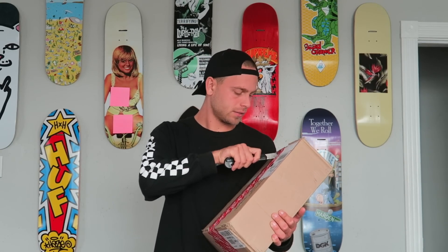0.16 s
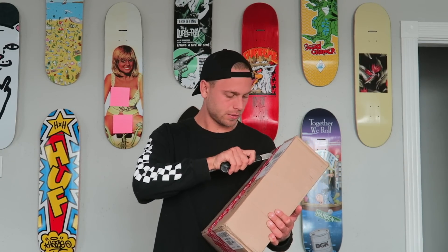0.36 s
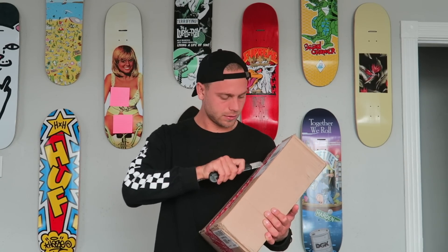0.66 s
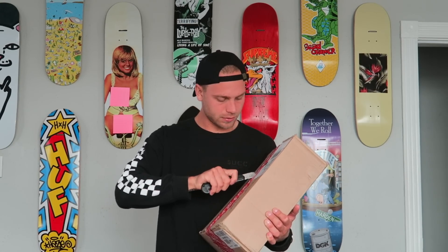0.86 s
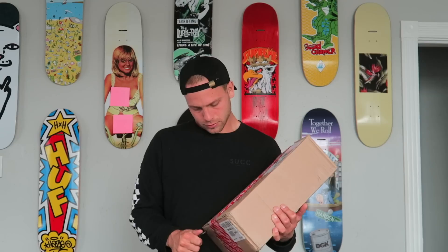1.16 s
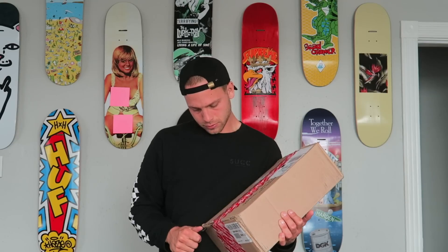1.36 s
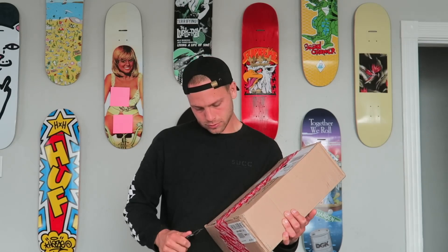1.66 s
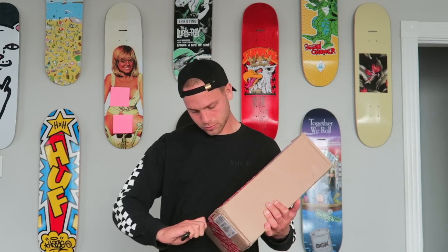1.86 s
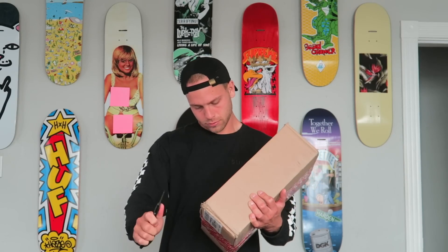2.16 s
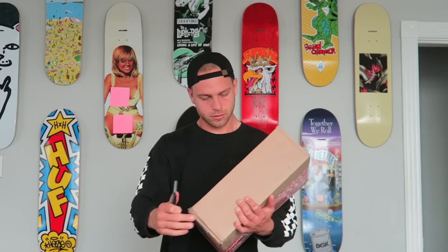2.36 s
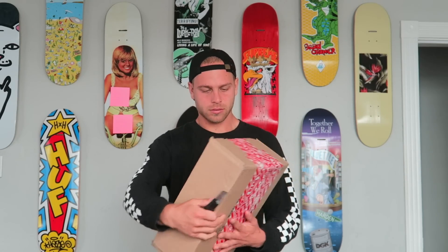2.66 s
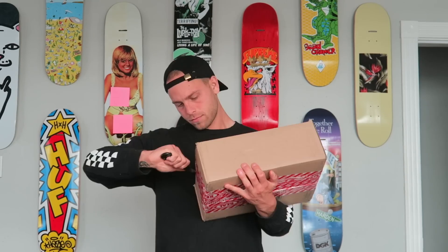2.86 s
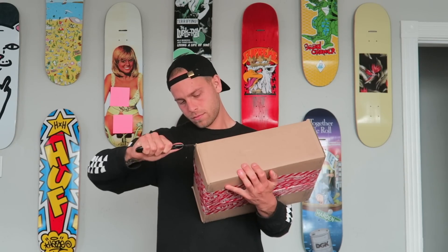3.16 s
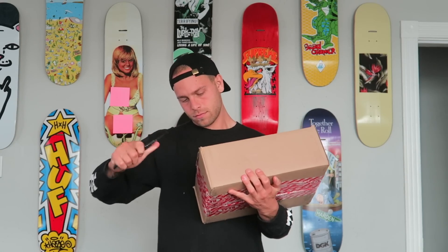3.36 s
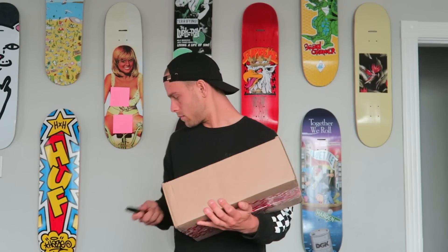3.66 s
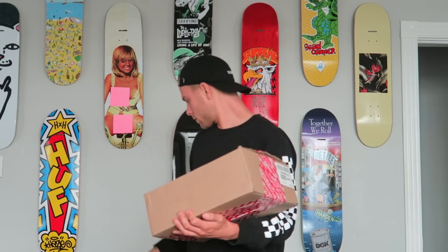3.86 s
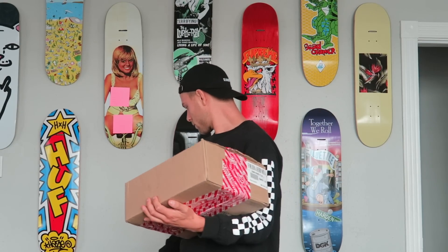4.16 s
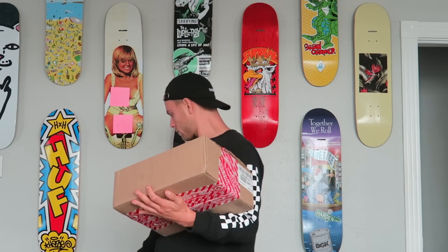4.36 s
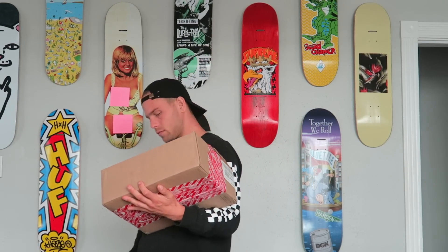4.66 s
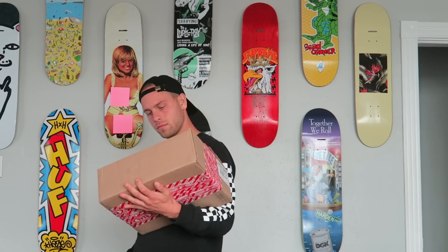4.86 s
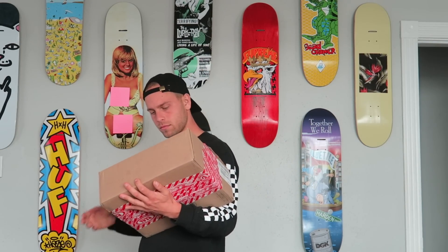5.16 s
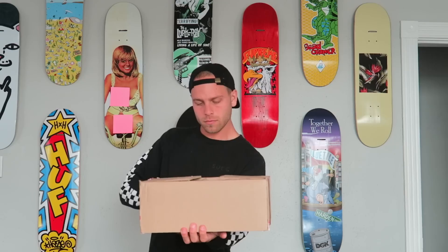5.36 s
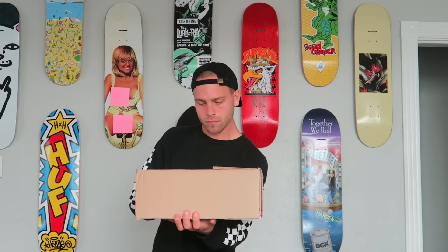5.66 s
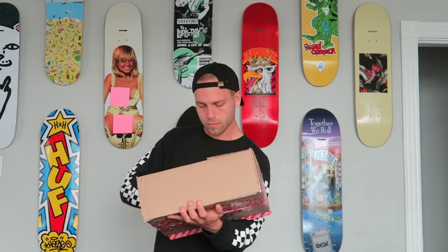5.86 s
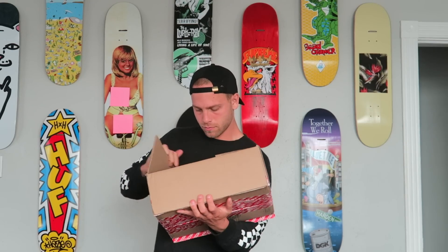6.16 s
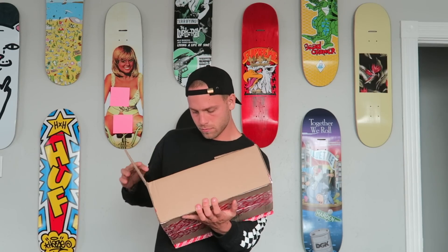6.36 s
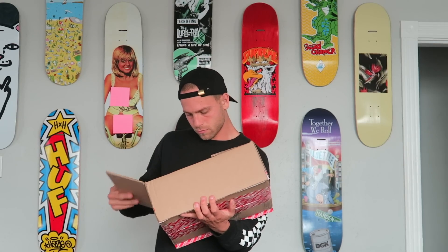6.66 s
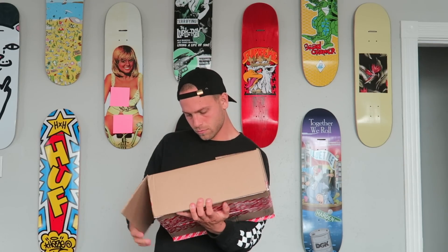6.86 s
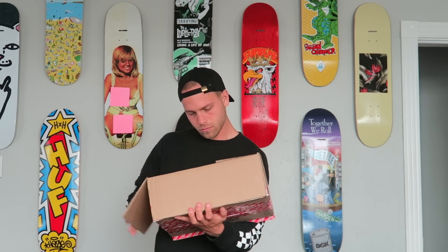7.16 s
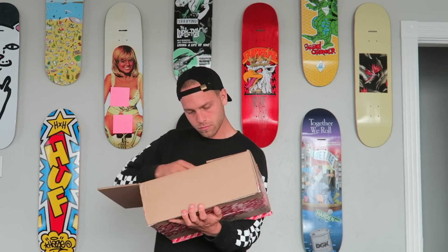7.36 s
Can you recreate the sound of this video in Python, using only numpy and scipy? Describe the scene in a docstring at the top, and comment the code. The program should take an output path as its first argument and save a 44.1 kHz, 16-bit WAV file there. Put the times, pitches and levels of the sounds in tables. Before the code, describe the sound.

A bare, reflective room with low ventilation noise and a faint wavering hum. From 0.05 to 0.25 s a blade jabs into a taped cardboard box with hollow crunches, then a rubbing slice runs along the seam from 0.6 to 1.1 s. Harder punctures come around 1.1-1.35, 1.7, 1.95-2.1, 2.75 and 3.05-3.2 s, mixing boxy thumps, tearing crackle and soft handling bumps. A light flick sounds at 3.35 s. From 3.63 to 3.9 s the blade rattles rapidly into its handle and clicks with a short metallic ring. A soft tap at 4.25 s precedes the knife clattering down at 4.77 s and bouncing at 4.96 s. A knock at 5.4 s leads to cardboard strokes, hand rustle and a creak near 6.1 s; flaps knock and drag at 6.7-6.98 s, then hissy sliding fades by 7.5 s. Echoes cut abruptly near 1.16, 1.84, 2.93 and 5.41 s.

```python
"""A knife jabs and saws through the tape of a hand-held cardboard box in a bare, ringing room.
Clicks and hiss are shaped into crushed board and splitting tape, while ringing tones make the box body.
The blade rattles back into its handle and clicks home; the knife is dropped and bounces.
Then hands slide over the board, as filtered grains and hiss, and the flaps creak and knock open.
A low room noise with a wavering hum lies beneath. Four times the sound breaks off abruptly."""
import sys
import numpy as np
from scipy import signal
from scipy.fft import rfft, irfft
from scipy.io import wavfile

SR = 44100
rng = np.random.default_rng(int(sys.argv[2]) if len(sys.argv) > 2 else 0)


def digitize_waveform(pressure):
    """Quantize a signal to 16-bit integers and store it at the path in sys.argv[1].

    Rows of a 2-D input are taken as channels; values are limited to [-1, 1].
    """
    field = np.atleast_2d(pressure).T
    bounded = np.clip(field, -1, 1)
    quanta = np.round(bounded * 32767).astype(np.int16)
    wavfile.write(sys.argv[1], SR, quanta)


N = 331632
TIME = np.arange(N) / SR  # seconds
HIT = SR // 3  # room for one hit, in samples

# Moments when the sounds and their echoes stop dead. Each entry: time in seconds.
BREAKS_S = [1.157, 1.84, 2.925, 5.41]
# Colour of a dull contact. Each row: frequency in Hz, level in dB.
DULL_CONTACT = [(90, -16.5), (200, 5), (400, 3.5), (1000, 4.5), (1500, 2), (3000, -39)]
# Colour of a light crisp contact. Each row: frequency in Hz, level in dB.
CRISP_CONTACT = [(900, -3), (1800, 2), (2800, 1.5), (4500, -8), (7500, -15), (11000, -22.5), (15500, -41)]
# Rubbing strength of four long slides over the box, which the table of slides refers to by name.
# Each row: time in seconds, relative level in dB.
SEAM_SLIDE = [(0.62, -70), (0.69, -37), (0.794, -36), (0.928, -46.5), (1.038, -35), (1.085, -38.5)]
TURN_SLIDE = [(5.42, -46.5), (5.486, -44), (5.628, -38), (5.772, -38), (5.79, -42), (6.126, -39.5),
              (6.182, -53), (6.198, -44), (6.42, -57)]
FLAP_SLIDE = [(6.42, -52.5), (6.634, -50.5), (6.672, -57), (6.678, -46), (6.764, -50.5), (6.802, -43.5),
              (6.898, -48.5), (6.98, -28.5), (7.17, -71)]
REACH_SLIDE = [(7.17, -55), (7.318, -37.5), (7.422, -51), (7.512, -67), (7.52, -53)]


def undb(db):
    """Turn decibels into gain."""
    return 10 ** (np.asarray(db) / 20)


def unit(x):
    """Scale to an rms (average strength) of 1."""
    return x / np.sqrt(np.mean(x ** 2) + 1e-30)


def blow(x, db):
    """Scale a hit so that its energy equals this level held for 5 ms."""
    energy = np.sum(x ** 2) + 1e-30
    return x * undb(db) * np.sqrt(0.005 * SR / energy)


def lookup(table, hz):
    """Read between the (Hz, value) points of a table, on a log-frequency axis."""
    f, value = np.transpose(table)
    return np.interp(np.log(hz + 1e-9), np.log(f), value)


def colour(x, spectrum, size=4096):
    """Filter a sound to the given (Hz, dB) shape without any sound ahead of its cause."""
    gain = undb(lookup(spectrum, np.fft.rfftfreq(size, 1 / SR)))
    cepstrum = irfft(np.log(gain))
    # fold the second half onto the first, so that the filter only looks back in time
    cepstrum[1:size // 2] *= 2
    cepstrum[size // 2 + 1:] = 0
    response = irfft(np.exp(rfft(cepstrum)))[:size // 2]
    return signal.fftconvolve(x, response)[:len(x)]


def grains(n, rate, spread_db):
    """Fibres snapping at random, rate times a second: many tiny clicks and a few big ones."""
    snaps = rng.random(n) < rate / SR
    signs = rng.choice([-1, 1], n)
    sizes = undb(spread_db * np.minimum(rng.exponential(size=n), 4))
    return unit(snaps * signs * sizes)


def burst(length, rate, spread_db, first, rise_s=0.0033):
    """A first contact, then a run of small slips that builds up and dies away over length seconds."""
    t = TIME[:HIT]
    envelope = np.exp(-t / max(length, 1e-4)) * (1 - np.exp(-t / rise_s))
    slips = grains(HIT, rate, spread_db) * envelope
    slips = slips / np.sqrt(np.sum(slips ** 2) + 1e-18)
    slips[0] += first
    return slips


def ring(push, modes):
    """A push sets off fading tones, the natural vibrations of a solid or of enclosed air."""
    t = TIME[:HIT]
    response = np.zeros(HIT)
    for hz, db, t60 in modes:
        tone = np.sin(2 * np.pi * hz * t + rng.uniform(0, 2 * np.pi))
        response += undb(db) * tone * np.exp(-np.log(1000) * t / t60)  # 60 dB down after t60
    return signal.fftconvolve(push, response * (1 - np.exp(-t / 0.0017)))[:HIT]


def add(track, s, sound):
    """Lay a sound in at time s; it ends at the next break."""
    start = int(s * SR)
    later_breaks = [int(b * SR) for b in BREAKS_S if b > s]
    end = min([start + len(sound), N] + later_breaks)
    track[start:end] += sound[:end - start]


def walk(rate):
    """Slow random wavering with a spread near 1, taking rate new values a second."""
    knots = rng.standard_normal(N // 100)
    return np.interp(TIME * rate, np.arange(len(knots)), knots)


def swell(s, db):
    """Gain that follows a dB curve and is practically silent outside it."""
    return undb(np.interp(TIME, s, db, left=-120, right=-120))


def brush(s, swell_s):
    """A short stroke that swells up to time s and lifts off a little faster."""
    width_s = np.where(TIME < s, swell_s, swell_s * 0.73)
    return np.exp(-((TIME - s) / width_s) ** 2)


def room_tone(noise_db=-46, waver_db=2):
    """Low ventilation noise, shaped from random noise, with a wavering hum of pure tones."""
    # Colour of the noise. Each row: frequency in Hz, level in dB.
    noise_colour = [(15, -36), (25, -21), (54, -3.5), (121, 2), (172, -4), (427, -9), (769, -13.5),
                    (1060, -15), (1210, -17), (2630, -20), (5280, -29), (10000, -44), (11200, -37),
                    (13100, -52), (15000, -52)]
    # How wide the noise is. Each row: frequency in Hz, side level relative to mid in dB.
    noise_width = [(50, -44), (130, -11), (300, -0.5), (900, -3.5), (2500, -19.5), (8000, 2.5)]
    # Tones of the hum. Each row: frequency in Hz, typical level in dB.
    hum_tones = [(59, -51.5), (122, -54.5)]
    mid = unit(colour(rng.standard_normal(N), noise_colour)) * undb(noise_db + 0.37 * walk(6.5))
    side = colour(unit(colour(rng.standard_normal(N), noise_colour)), noise_width) * undb(noise_db)
    hum = np.zeros(N)
    for hz, db in hum_tones:
        tone = np.sqrt(2) * np.sin(2 * np.pi * hz * TIME + 0.5 * walk(11))
        hum += undb(db + waver_db * walk(11)) * tone
    return np.array([mid + side, mid - side]) + hum


def room_tail(delay_s=0.003, build_s=0.00073):
    """Dense reflections from bare walls: noise in which every band fades at its own rate."""
    # How long the room rings. Each row: frequency in Hz, time to fade by 60 dB in seconds.
    fade_times = [(100, 0.39), (260, 0.55), (700, 0.57), (1840, 0.57), (4850, 0.54), (12800, 0.41)]
    f, t, cells = signal.stft(rng.standard_normal(SR * 3 // 4), SR, nperseg=256)
    fade = np.exp(-np.log(1000) * t / lookup(fade_times, f)[:, None])
    tail = signal.istft(cells * fade, SR)[1]
    since_arrival = np.maximum(TIME[:len(tail)] - delay_s, 0)
    tail = tail * (1 - np.exp(-since_arrival / build_s))
    return tail / np.sqrt(np.sum(tail ** 2))


def room(x):
    """Echoes, wide only in the treble, stop dead at each break; after each break the reflections are drawn
    anew."""
    # How wide the echoes are. Each row: frequency in Hz, side level relative to mid in dB.
    echo_width = [(100, -41), (400, -14), (1200, -26), (2600, -66.5), (4400, -22), (6500, -3.5), (9000, 3),
                  (15000, 0.5)]
    heard = []
    for part in np.split(x, [int(b * SR) for b in BREAKS_S]):
        # every part between breaks has its own pattern of reflections
        mid, side = room_tail(), colour(room_tail(), echo_width)
        tails = np.array([mid + side, mid - side])
        heard.append(signal.fftconvolve(part[None], tails, axes=1)[:, :len(part)])
    return np.hstack(heard)


def handling():
    """Light taps of fingers and things put aside, and soft low bumps as the body shifts its weight."""
    # Taps. Each row: start in seconds, dull level in dB, crisp level in dB, fading time in seconds.
    taps = [(0.168, -35, -36.5, 0.0072), (2.349, -52, -38.5, 0.024), (3.346, -35, -24, 0.017),
            (4.248, -28, -30.5, 0.0064), (5.403, -28, -33, 0.0043), (6.678, -56, -31, 0.0059),
            (6.716, -28.5, -43, .012)]
    # Bumps. Each row: start in seconds, level in dB, fading time in seconds.
    bumps = [(0.239, -26.5, 0.031), (2.057, -23, 0.044), (2.767, -24, 0.089), (3.069, -22.5, 0.11),
             (3.148, -26, .05), (4.25, -30.5, 0.027), (4.386, -31.5, 0.02)]
    # Colour of a bump. Each row: frequency in Hz, level in dB.
    bump_colour = [(20, -19), (45, -13), (78, 0), (125, 2), (220, -10.5), (500, -24), (1500, -75)]
    out = np.zeros(N)
    for s, dull_db, crisp_db, length in taps:
        touch = burst(length, rate=2800, spread_db=5.5, first=0.055)
        dull = blow(colour(touch, DULL_CONTACT), dull_db)
        crisp = blow(colour(touch, CRISP_CONTACT), crisp_db)
        add(out, s, dull + crisp)
    for s, db, length in bumps:
        push = burst(length, rate=680, spread_db=3.5, first=0.4)
        add(out, s, blow(colour(push, bump_colour), db))
    return out


def rubs(board_db=-1, hiss_db=-2.5, uneven_db=4.0, crackle_db=-7):
    """Sliding friction: the board rumbles, its smooth face hisses and loose tape crackles."""
    # Short brushes of blade or hand across the box. Each row: time of the height in seconds,
    # swell time in seconds, relative board level in dB, relative hiss level in dB.
    brushes = [(1.26, 0.081, -42.5, -44.5), (1.688, 0.052, -41.5, -43), (1.945, 0.04, -48, -42.5),
               (2.56, 0.059, -47.5, -66), (2.694, 0.11, -46, -38), (2.985, 0.044, -41, -48.5),
               (3.047, 0.012, -26, -26), (3.56, 0.077, -50, -67), (4.5, .08, -52, -54),
               (5.36, 0.18, -43, -54.5)]
    # What each long slide stirs. Each row: curve of rubbing strength, then board level in dB and
    # hiss level in dB, both relative to that curve.
    slides = [(SEAM_SLIDE, 0.66, -10.5), (TURN_SLIDE, -3.5, 0.5), (FLAP_SLIDE, -0.87, 0.93),
              (REACH_SLIDE, -13, 2.45)]
    # Colour of the rumbling board. Each row: frequency in Hz, level in dB.
    board_colour = [(80, -23), (170, 2.5), (300, 3), (400, 3), (500, 4.5), (680, -4), (1000, -3.5),
                    (1350, -5), (2000, -14), (4000, -49)]
    # Colour of the hissing face. Each row: frequency in Hz, level in dB.
    hiss_colour = [(900, 3.5), (1700, 2.5), (2700, 4.5), (4500, 1), (7000, -4), (11000, -8.5), (15500, -23)]
    board = undb(board_db) * unit(colour(grains(N, rate=2000, spread_db=3.0), board_colour))
    hiss = unit(colour(rng.standard_normal(N), hiss_colour))
    crackle = unit(colour(grains(N, rate=140, spread_db=3.5), CRISP_CONTACT))
    surface = undb(hiss_db) * hiss + undb(crackle_db) * crackle
    moves = [(brush(s, swell_s), press_db, face_db) for s, swell_s, press_db, face_db in brushes]
    moves += [(swell(*np.transpose(curve)), press_db, face_db) for curve, press_db, face_db in slides]
    sound = np.zeros(N)
    for strength, press_db, face_db in moves:
        sound += strength * (undb(press_db) * board + undb(face_db) * surface)
    return sound * undb(uneven_db * walk(45))


def drags(table, modes, first):
    """An edge catches and slips on the board and sets its vibrations ringing."""
    out = np.zeros(N)
    for s, db, length in table:
        slips = burst(length, rate=1200, spread_db=1.5, first=first)
        add(out, s, blow(ring(slips, modes), db))
    return out


def edge_strokes():
    """Flaps and box edges rub in short strokes whose slips make the board ring."""
    # Strokes. Each row: start in seconds, level in dB, fading time in seconds.
    strokes = [(5.602, -21.5, 0.026), (5.645, -33, 0.015), (5.845, -25, 0.035)]
    # Ringing of the board. Each row: frequency in Hz, level in dB, time to fade by 60 dB in seconds.
    stroke_modes = [(183, -4.5, 0.031), (404, -6, 0.042), (503, -2, 0.06), (940, -15, 0.023),
                    (1378, 1, 0.043), (1380, 0.5, 0.027)]
    return drags(strokes, stroke_modes, first=0.35)


def flap_knocks():
    """The open flap knocks and drags, and its slips make the box boom."""
    # Knocks. Each row: start in seconds, level in dB, fading time of the drag in seconds.
    knocks = [(5.397, -15, 0.0056), (6.714, -18, 0.003), (6.741, -21.5, 0.013), (6.815, -25, 0.071),
              (6.91, -16, 0.01), (6.953, -19, 0.014)]
    # Ringing of the open box. Each row: frequency in Hz, level in dB, time to fade by 60 dB in seconds.
    open_box = [(125, -16, 0.19), (202, -15, 0.048), (262, -3.5, 0.06), (342, 2, 0.048), (396, -2.5, 0.083),
                (445, -26, .05), (715, -16, 0.026), (1060, -17.5, 0.015)]
    return drags(knocks, open_box, first=0.45)


def creak(gain_db=-3):
    """The stiff fold of a flap yields in uneven slips."""
    # Slips. Each row: start in seconds, relative level in dB, fading time in seconds.
    fold_slips = [(6.089, -19, 0.016), (6.111, -16, 0.0031), (6.122, -11.5, 0.014), (6.139, -12.5, 0.014),
                  (6.231, -28.5, 0.0045)]
    # Colour of the fold. Each row: frequency in Hz, level in dB.
    fold_colour = [(100, -26), (220, -12), (370, 2.5), (520, 2.5), (620, -3.5), (740, -3), (1250, -6.5),
                   (1800, -14), (3000, -23.5), (8000, -55)]
    out = np.zeros(N)
    for s, db, length in fold_slips:
        slips = burst(length, rate=1800, spread_db=2.5, first=0.4)
        add(out, s, blow(colour(slips, fold_colour), db + gain_db))
    return out


def dropped_knife(gain_db=-5.0, ring_db=-13, thud_db=-6.5):
    """The knife lands on a hard top, bounces once and settles: a crack, a ring and a thud each time."""
    # Contacts. Each row: start in seconds, relative level in dB, fading time of the clatter in seconds.
    drops = [(4.7637, -12.5, 0.012), (4.768, -7.5, 0.0049), (4.787, -19, 0.0075), (4.958, -21.5, 0.0096),
             (4.966, -9, 0.025), (5.014, -19, 0.033)]
    # Ringing of the knife. Each row: frequency in Hz, level in dB, time to fade by 60 dB in seconds.
    knife_modes = [(320, -28, 0.059), (580, 7, 0.078), (830, -11, 0.1), (1005, 9, 0.12), (1900, -8, 0.047),
                   (2410, -8, .02), (2950, 0, 0.085), (3450, -11, 0.041), (4500, -11, .02),
                   (6600, 4, 0.033)]
    # Colour of the crack. Each row: frequency in Hz, level in dB.
    crack_colour = [(500, -30.5), (1300, -10), (1900, 2), (2500, -1.5), (3300, 5), (4300, -2.5),
                    (6500, -9.5), (9000, -12.5), (12000, -15.5), (15500, -42)]
    out = np.zeros(N)
    for s, db, length in drops:
        contact = burst(length, rate=6000, spread_db=0.5, first=0.31, rise_s=0.002)
        crack = blow(colour(contact, crack_colour), 0)
        ringing = blow(ring(contact, knife_modes), ring_db)
        thud = blow(colour(contact, DULL_CONTACT), thud_db)
        add(out, s, undb(db + gain_db) * (crack + ringing + thud))
    return out


def blade_stop(gain_db=-10.0, ring_db=-8):
    """The blade clicks home, chatters against its stop and rings on briefly."""
    # Clicks. Each row: start in seconds, relative level in dB.
    clicks = [(3.8948, -1.5), (3.8969, -5.5), (3.9, -5.5), (3.903, -12)]
    # Colour of the handle. Each row: frequency in Hz, level in dB.
    handle_colour = [(700, -52), (1400, -15), (2000, -1.5), (2700, 7), (3300, 0), (4100, -10.5),
                     (6000, -13.5), (11000, -53), (15500, -34)]
    # Ringing of the blade. Each row: frequency in Hz, level in dB, time to fade by 60 dB in seconds.
    blade_modes = [(2580, 1, .45), (2660, -3, 0.49), (2893, -1, 0.38), (3135, 4, .45), (3310, -7, 0.26)]
    out = np.zeros(N)
    for s, db in clicks:
        contact = burst(0.0005, rate=20000, spread_db=1, first=0.3, rise_s=0.0005)
        click = blow(colour(contact, handle_colour), db + gain_db)
        ringing = blow(ring(contact, blade_modes), db + gain_db + ring_db)
        add(out, s, click + ringing)
    return out


def blade(catch_db=-3, tick_db=-4.5, shift_octaves=0.11):
    """The blade scrapes back into its handle and keeps catching: a tick, the catch, a rebound."""
    # Strength of the scrape over time. Each row: time in seconds, level in dB.
    scrape = [(3.634, -40), (3.645, -25.5), (3.72, -24), (3.8, -24), (3.85, -26), (3.885, -27.5),
              (3.9, -60)]
    # Catches of the sliding blade. Each row: start in seconds, relative level in dB.
    catches = [(3.644, -16.5), (3.672, -14.5), (3.705, -13), (3.734, -15.5), (3.756, -14.5), (3.779, -23),
               (3.803, -15.5), (3.822, -17), (3.8541, -16)]
    # Colour of the blade. Each row: frequency in Hz, level in dB.
    blade_colour = [(350, -24), (600, -18), (890, -14.5), (1560, -7.5), (1880, 2), (2570, 4.5), (2910, 0),
                    (3420, 3), (4090, -3), (4810, -0.5), (5900, -5), (8870, -7.5), (12100, -14.5),
                    (15500, -35)]
    gap_s, chatter_s = 0.005, 0.003  # spacing of tick, catch and rebound; fading time of each
    out = swell(*np.transpose(scrape)) * unit(colour(grains(N, rate=7000, spread_db=2.0), blade_colour))
    for s, db in catches:
        for offset, part_db in [(-gap_s, tick_db), (0, 0), (gap_s, tick_db)]:
            chatter = burst(chatter_s, rate=8000, spread_db=2.5, first=0.2, rise_s=0.001)
            # each point of contact rings a little differently
            shift = 2 ** (shift_octaves * rng.uniform(-1.3, 1))
            shifted = [(hz * shift, g) for hz, g in blade_colour]
            add(out, s + offset, blow(colour(chatter, shifted), db + catch_db + part_db))
    return out


def blade_flick():
    """The blade flicks free of the box edge, and its slips make the edge ring."""
    # Flicks. Each row: start in seconds, level in dB, fading time of the drag in seconds.
    flicks = [(3.346, -22, 0.023)]
    # Ringing of the flick. Each row: frequency in Hz, level in dB, time to fade by 60 dB in seconds.
    flick_modes = [(524, -8, 0.039), (846, -2, 0.039), (1026, 8, 0.028), (1240, -4, 0.029),
                   (1480, -10, 0.027), (2050, -5, 0.056), (2294, 3, 0.042)]
    return drags(flicks, flick_modes, first=0.45)


def jabs(body_db=0, crunch_db=-1, crackle_db=-2.5, focus_db=10, slice_crunch_db=-4):
    """The blade bursts through tape and board, then slices on, shaking the panels nearest its pitch."""
    # Jabs. Each row: start in seconds, body level in dB, body centre in Hz, relative crunch level in dB,
    # level of the slice that follows in dB relative to the jab.
    jab_table = [(0.055, -33, 576, -38, -5), (0.193, -24.5, 220, -26, 2), (0.232, -14, 590, -22.5, -3),
                 (1.093, -15.5, 406, -23, -5), (1.139, -18, 170, -26, -20), (1.282, -11, 321, -20.5, -3),
                 (1.341, -17, 408, -20.5, -7.5), (1.705, -21.5, 510, -19, -13), (1.939, -23, 584, -22, -1),
                 (2.006, -25.5, 456, -22.5, -2), (2.057, -14.5, 540, -21.5, -2),
                 (2.116, -23.5, 540, -21, -3), (2.742, -17, 337, -24, -7), (2.763, -14, 260, -16.5, -0.5),
                 (3.054, -12.5, 450, -18, 0), (3.113, -17, 334, -16.5, -3), (3.166, -16, 220, -18.5, -2.5)]
    # Ringing of the panels and the air in the box. Each row: frequency in Hz, level in dB before the
    # focus on one pitch, time to fade by 60 dB in seconds.
    box_modes = [(122.6, -8, 0.44), (178.7, 2.5, .13), (250, 2.5, 0.1), (310, 2, 0.12), (364, 3.5, 0.087),
                 (433.4, -0.5, 0.097), (513, 10.5, 0.045), (580, 2, 0.047), (668, -4, 0.081),
                 (875, 3, 0.068)]
    # Colour of crushed board. Each row: frequency in Hz, level in dB.
    crunch_colour = [(100, -10), (250, -24), (450, -22), (730, -1.5), (1000, -3.5), (1150, -3), (1370, 2),
                     (1700, -4), (2050, -5), (2900, -12.5), (6000, -39)]
    # Colour of splitting tape. Each row: frequency in Hz, level in dB.
    crackle_colour = [(700, 2.5), (1500, -19), (2100, 4), (3100, 1.5), (4200, -3), (6500, -7.5),
                      (9000, -13.5), (12000, -14.5), (15500, -60)]
    puncture_s = 0.016  # fading time as the tip breaks through
    slice_after_s, slice_s = 0.022, 0.052  # then the edge slices on: its delay and fading time
    out = np.zeros(N)
    for s, db, hz, bite_db, slice_db in jab_table:
        modes = []
        for f, g, t60 in box_modes:
            octaves_away = abs(np.log2(f / hz))
            modes.append((f, g - focus_db * np.tanh(2 * octaves_away), t60))
        # each stage: delay in seconds, fading time in seconds, level in dB, extra crunch in dB
        stages = [(0, puncture_s, 0, 0), (slice_after_s, slice_s, slice_db, slice_crunch_db)]
        for delay, length, stage_db, flutes_db in stages:
            crush = colour(burst(length, rate=1400, spread_db=2, first=0.22, rise_s=0.0034), crunch_colour)
            split = colour(burst(length, rate=5000, spread_db=1.0, first=0.14, rise_s=0.0018), crackle_colour)
            body = ring(burst(length * 0.61, rate=1500, spread_db=2, first=1.17, rise_s=0.0048), modes)
            sound = blow(body, db + body_db)
            sound += blow(crush, bite_db + crunch_db + flutes_db)
            sound += blow(split, bite_db + crackle_db)
            add(out, s + delay, undb(stage_db) * sound)
    return out


def scene():
    """Every source is heard directly and through the room, over the room's own noise."""
    # each row: sound, share sent to the walls as a gain
    sources = [(handling(), undb(1.0)),
               (rubs(), undb(-0.5)),
               (edge_strokes(), undb(-13)),
               (flap_knocks(), undb(-6)),
               (creak(), undb(-2.5)),
               (dropped_knife(), undb(0)),
               (blade_stop(), undb(-6.0)),
               (blade(), undb(-6)),
               (blade_flick(), undb(-6)),
               (jabs(), undb(-5.5))]
    direct = sum(sound for sound, _ in sources)
    to_walls = sum(sound * share for sound, share in sources)
    return direct + room(to_walls) + room_tone()


def record(dry):
    """The sharpest peaks are rounded off and everything above 15400 Hz is cut."""
    rounded = dry / (1 + (dry / 0.9) ** 6) ** (1 / 6)
    top_cut = signal.ellip(10, 0.2, 80, 15400, fs=SR, output="sos")
    return signal.sosfilt(top_cut, rounded)


dry = scene()
out = record(dry)
digitize_waveform(out)
```